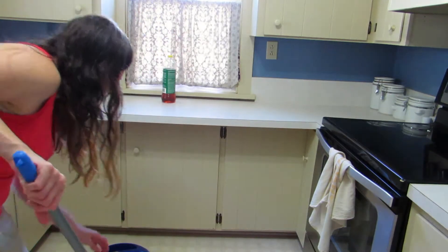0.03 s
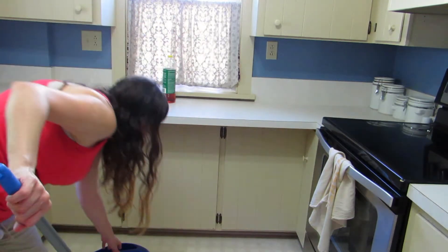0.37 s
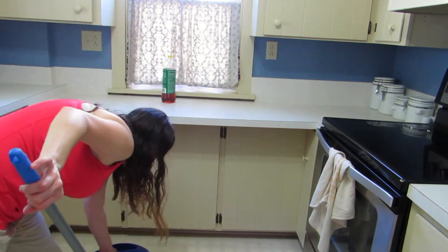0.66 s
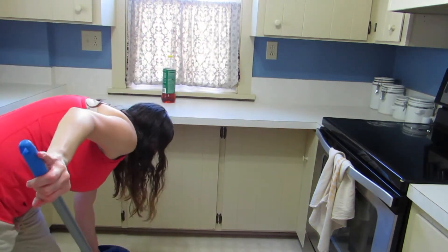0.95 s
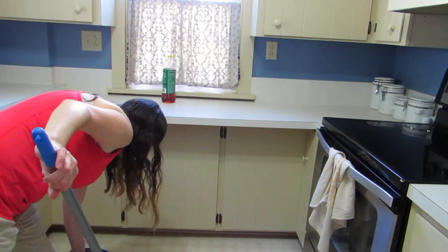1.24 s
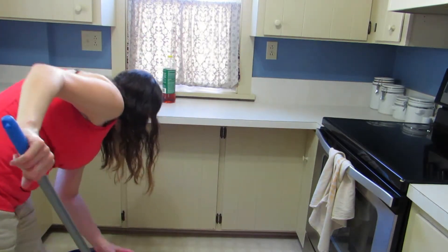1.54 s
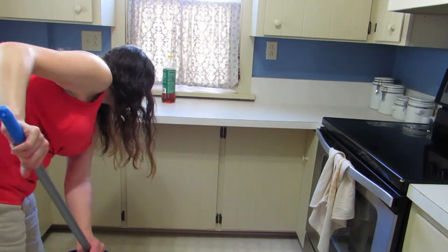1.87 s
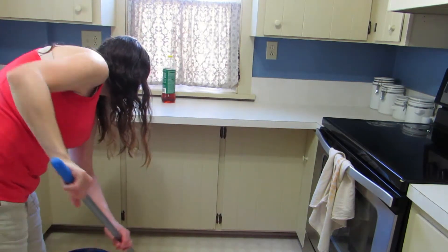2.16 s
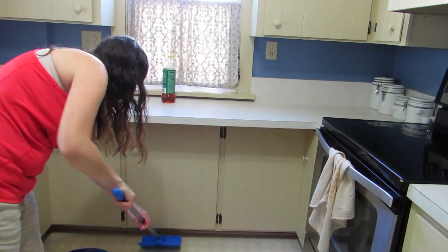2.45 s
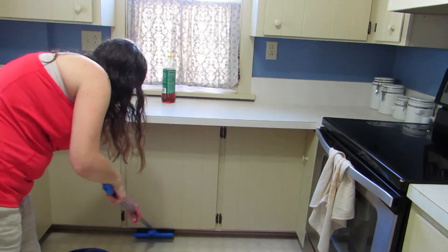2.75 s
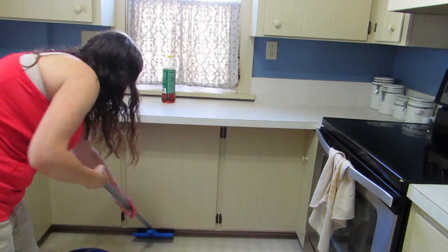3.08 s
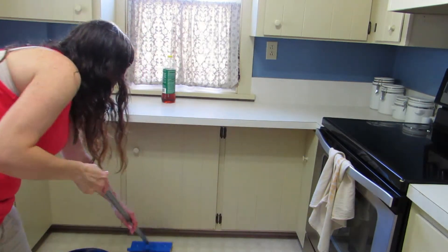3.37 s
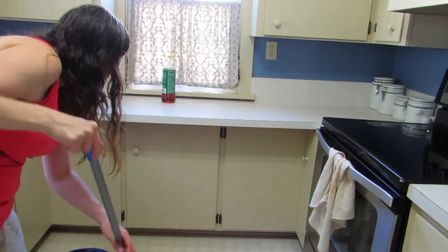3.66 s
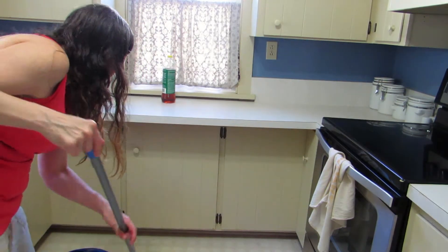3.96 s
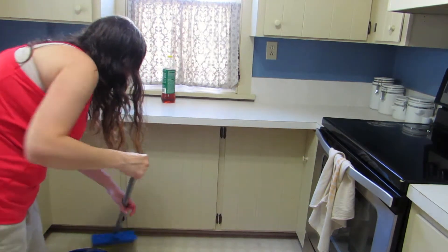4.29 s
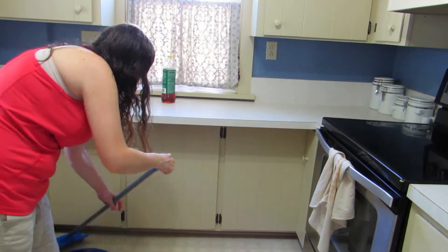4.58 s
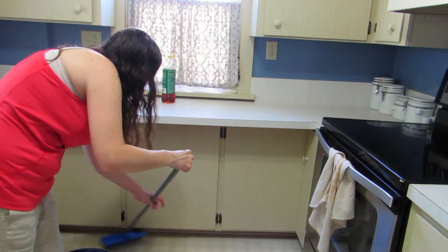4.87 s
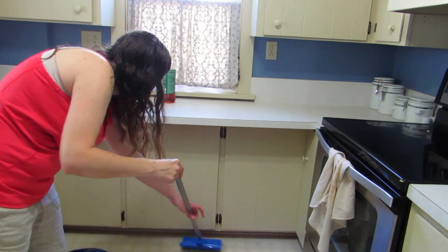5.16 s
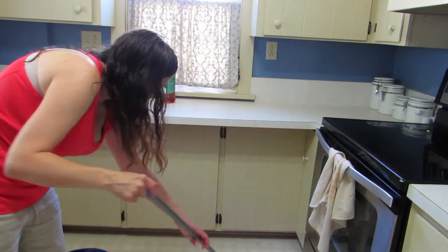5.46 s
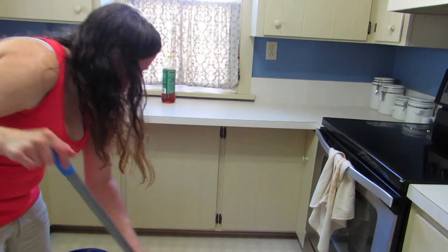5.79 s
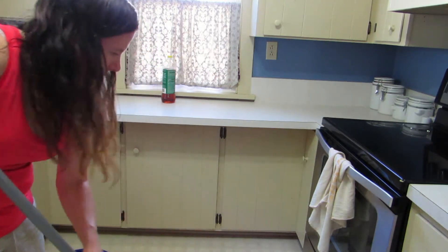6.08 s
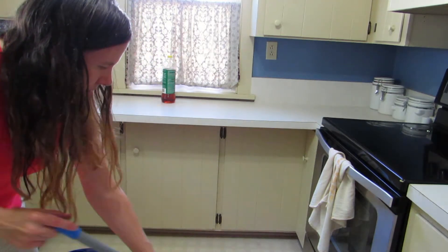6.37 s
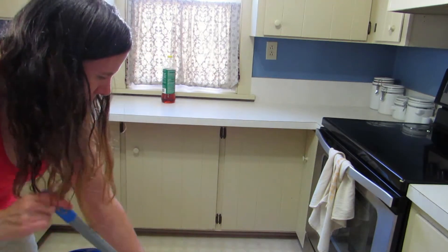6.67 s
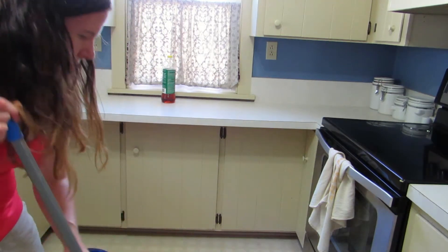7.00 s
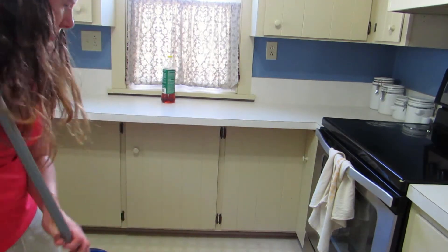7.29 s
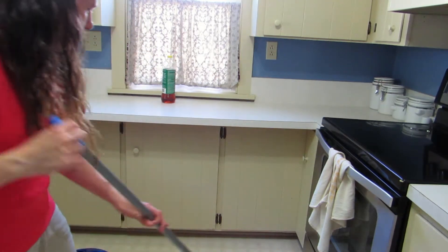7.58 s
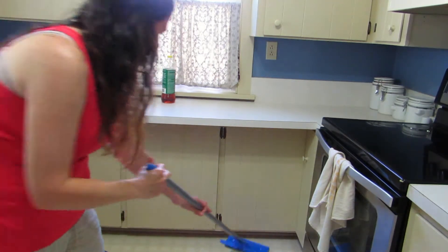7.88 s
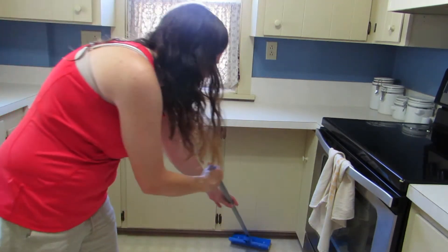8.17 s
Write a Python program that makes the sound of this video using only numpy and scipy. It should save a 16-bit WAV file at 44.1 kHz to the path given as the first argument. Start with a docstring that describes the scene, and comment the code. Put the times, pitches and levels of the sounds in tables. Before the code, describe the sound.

Water patters briefly into a bucket as a mop is wrung out, with light knocks and a faint rustle of clothes. The mop thuds down and is pushed about, its wet pad scrubbing and its head clacking. Later the handle clangs loudly against sheet metal, leaving a long shimmering ring and two small knocks. A low refrigerator hum fills the small, slightly echoing kitchen, heard through a narrow-band microphone that overloads a little.

```python
"""A refrigerator hums in a small hard kitchen. Cloth rustles, a flat mop knocks lightly and is wrung out,
and water patters into a bucket. The mop is set down on the floor with a thud and pushed about:
its wet pad scrubs, its head and swivel knock. Back at the bucket the metal handle hits sheet metal,
which clangs and rings on under two last knocks. The loudest blows overload a narrow-band microphone."""
import sys
import numpy as np
from scipy import signal
from scipy.fft import rfft, irfft
from scipy.io import wavfile
from scipy.ndimage import uniform_filter1d, minimum_filter1d

SR = 44100
rng = np.random.default_rng(int(sys.argv[2]) if len(sys.argv) > 2 else 0)


def master(y):
    """Save y as 16-bit WAV."""
    cut = np.clip(np.atleast_2d(y).T, -1, 1)
    pcm = np.round(cut * 32767)  # scale
    wavfile.write(sys.argv[1], SR, pcm.astype(np.int16))


N = 363162


def amp(db):
    """Decibels to gain."""
    return 10 ** (np.asarray(db) / 20)


def unit(x):
    """Scales to rms 1."""
    return x / np.sqrt(np.mean(x ** 2) + 1e-20)


def read(curve, hz):
    """Reads a curve on a log-frequency axis."""
    f, value = np.transpose(curve)
    return np.interp(np.log(hz + 1), np.log(f + 1), value)


def add(mix, start_s, sound):
    """Mixes a sound in at its start time."""
    part = mix[max(round(start_s * SR), 0):][:len(sound)]
    part += sound[:len(part)]


def colour(x, spectrum):
    """Shapes x with an EQ curve, at rms 1."""
    hz = np.fft.rfftfreq(len(x), 1 / SR)
    return unit(irfft(rfft(x) * amp(read(spectrum, hz)), len(x)))


def noise(gains):
    """Noise with the given gain at each frequency, at rms 1."""
    return unit(irfft(rfft(rng.standard_normal(N)) * gains, N))


def die_away(x, t60_curve):
    """Lets each band of x decay at its own speed; t60 is the time to fall 60 dB."""
    hz, t, bands = signal.stft(x, SR, nperseg=512)
    decay = amp(-60 * t / read(t60_curve, hz)[:, None])
    return signal.istft(bands * decay, SR, nperseg=512)[1][:len(x)]


def ring(modes, size):
    """Damped sines of random polarity."""
    t = np.arange(size) / SR
    return sum(rng.choice([-1, 1]) * amp(db - 60 * t / t60) * np.sin(2 * np.pi * hz * t)
               for hz, db, t60 in modes)


def strokes(rows, attack_s, release_s):
    """Envelope of hand movements: each builds up, holds and dies away."""
    t = np.arange(N) / SR
    return sum(amp(db) * np.clip((t - start) / attack_s, 0, 1)
               * np.exp(-np.maximum(t - start - hold, 0) / release_s) for start, hold, db in rows)


# The room's tail. Each row: frequency in Hz, t60 in seconds.
ROOM_T60 = [(120, 0.38), (300, 0.45), (600, 0.56), (1200, 0.52), (3000, 0.55), (7000, 0.53)]

def kitchen(direct=0.45, early_boost=1.86, early_s=0.037):
    """Direct sound, a cluster of echoes from floor and cupboards, and the tail of the room."""
    t = np.arange(SR) / SR
    taps = rng.choice([-1, 1], SR) * (rng.random(SR) < 1 / 10)
    echoes = die_away(taps, ROOM_T60) * (1 + early_boost * np.exp(-t / early_s))
    return echoes / np.linalg.norm(echoes) + direct * (t == 0)


def grains(per_s, spread_db):
    """Random small impacts of uneven size, heard through the room."""
    sizes = amp(spread_db * np.minimum(rng.exponential(1, N), 4)) * rng.choice([-1, 1], N)
    impacts = sizes * (rng.random(N) < per_s / SR)
    return signal.fftconvolve(impacts, kitchen())[:N]


# Room and cabinet resonances. Each row: centre in Hz, width in Hz, level in dB.
DRONE_BANDS = [(18.4, 16, -29), (57, 20, -37), (87, 12, -48), (146.3, 1.6, -50.5), (229.4, 16, -41.5),
               (263.5, 12, -50), (327.8, 9, -44), (459, 85, -48), (748, 27, -52.5), (1200, 26, -62)]
# Steady room tone. Each row: frequency in Hz, relative level in dB.
AIR_EQ = [(15, 0.5), (26, 4), (38, -16.5), (60, -14.5), (110, -15.5), (260, -18), (700, -27), (1000, -29.5),
          (1600, -40.5), (2100, -39), (3200, -47.5), (4800, -67), (6700, -56.5), (7600, -65)]

def refrigerator(mains_hum_hz=120, hum_db=-32, fade_db=9.5, waver=0.11, air_db=-28):
    """Wavering mains hum over the resonances that the refrigerator stirs and the soft air of the room."""
    t, hz = np.arange(N) / SR, np.fft.rfftfreq(N, 1 / SR)
    drift = noise(np.exp(-hz / 3))
    level = amp(hum_db - fade_db * (t / t[-1]) ** 1.35)  # sinks ever faster
    hum = level * unit(np.sin(2 * np.pi * mains_hum_hz * t)) * (1 + waver * drift)
    drone = sum(amp(db) * noise(1 / (1 + (2 * (hz - centre) / width) ** 2))
                for centre, width, db in DRONE_BANDS)
    air = amp(air_db) * colour(rng.standard_normal(N), AIR_EQ)
    return hum + drone + air


# Rubs of pad and clothes. Each row: start in seconds, length in seconds, level in dB.
SWISH_STROKES = [(0.01, 0.021, -46), (0.12, 0.4, -64), (1.92, 0.32, -55.5), (2.28, 0.35, -62),
                 (2.87, 0.17, -57), (3.22, 0.22, -59), (3.44, 0.3, -56), (4.78, 0.21, -58),
                 (5.40, 0.28, -61), (5.81, 0.095, -57), (6.87, 0.24, -52)]
# Their bright, dry tone. Each row: frequency in Hz, relative level in dB.
SWISH_EQ = [(300, -4), (900, 11), (1600, 14), (3000, 9.5), (4700, -8), (5600, 0), (6800, 4.5), (8000, -5)]

def swishes():
    """Dry fibres catch and slip in a fine grain."""
    friction = colour(grains(per_s=1500, spread_db=-4), SWISH_EQ)
    return strokes(SWISH_STROKES, attack_s=0.034, release_s=0.066) * friction


# What a blow rings, from low thud to top click. Each row: pitch in Hz, relative level in dB,
# t60 in seconds.
FLOOR_MODES = [(163.5, -3, 0.035), (252, 0, 0.063), (308, 1, 0.04), (353, 4, 0.043)]
HEAD_MODES = [(460.3, 6.5, 0.024), (553, -5, 0.076), (653, -4.5, 0.074), (701, -1, 0.036)]
SWIVEL_MODES = [(822, 8, 0.011), (1010, 0.5, 0.02), (1167, 3.5, 0.014), (1467, -3, 0.012)]
HANDLE_MODES = [(1795, 5.5, 0.0062), (2200, -2.5, 0.0095), (2607, -0.5, 0.0094), (3090, 1, 0.0044)]
TICK_MODES = [(3760, 1, 0.0021), (4700, -5, 0.0021), (5660, -5.5, .003), (6540, 3.5, 0.0021)]
# What each new contact loses, in dB: floor, head, swivel, handle, tick.
CONTACT_LOSS_DB = [11, 2.7, 7, 20, 6.6]
# The mop's blows. Each row: start in seconds, number of contacts, floor, head and swivel levels in dB,
# hardness in dB per octave.
MOP_BLOWS = [(0.470, 2, -40, -32.5, -27.5, -5), (0.553, 1, -56, -54, -54, 8),
             (0.584, 1, -56, -41, -40.5, -5), (0.656, 1, -58, -60, -64.5, 13),
             (2.138, 1, -52.5, -67, -58, 10), (2.587, 4, -1.5, -13, -15.5, -0.5),
             (3.121, 2, -18, -30, -36.5, 1), (3.179, 1, -38, -32.5, -30.5, -2.5),
             (3.816, 1, -52, -41.5, -42.5, -0.5), (4.131, 2, -31.5, -25, -34, 5),
             (4.433, 1, -34, -32, -29, -2), (4.609, 1, -62, -45, -38.5, 3), (5.642, 1, -66, -41.5, -52, -3),
             (8.116, 1, -47, -30, -32.5, 3), (8.183, 1, -48, -33.5, -33.5, -1)]

def knocks(rock_s=0.023, to_handle_db=-9.5, to_tick_db=-28):
    """Each blow rings floor, head and swivel; the flat head may rock from edge to edge before it rests."""
    out = np.zeros(N)
    handle_octaves = np.log2(HANDLE_MODES[0][0] / SWIVEL_MODES[0][0])
    tick_octaves = np.log2(TICK_MODES[0][0] / SWIVEL_MODES[0][0])
    for start, contacts, floor_db, head_db, swivel_db, hardness in MOP_BLOWS:
        # the harder the blow, the more the swivel passes on to handle and tick
        handle_db = swivel_db + to_handle_db + hardness * handle_octaves
        tick_db = swivel_db + to_tick_db + hardness * tick_octaves
        parts = [(FLOOR_MODES, floor_db), (HEAD_MODES, head_db), (SWIVEL_MODES, swivel_db),
                 (HANDLE_MODES, handle_db), (TICK_MODES, tick_db)]
        for k in range(contacts):
            room = kitchen()
            for (modes, db), loss_db in zip(parts, CONTACT_LOSS_DB):
                add(out, start + k * rock_s, amp(db - k * loss_db) * strike(modes, room))
    return out


def strike(modes, room, cushion_s=0.0038, flex_s=0.004):
    """One part, struck once and heard through the room."""
    low_hz, high_hz = modes[0][0], modes[-1][0]
    blow = signal.fftconvolve(ring(modes, size=12000), room)
    # a part radiates little outside the range of its modes
    band = signal.butter(2, [0.8 * low_hz, 1.103 * high_hz], "band", fs=SR, output="sos")
    blow = signal.sosfilt(band, blow)
    # the soft pad cushions the contact, and the higher parts take longer to get going
    rise_s = cushion_s + flex_s * min(low_hz / HANDLE_MODES[0][0], 1)
    blow *= 1 - np.exp(-np.arange(len(blow)) / (SR * rise_s))
    return blow / np.std(blow[:SR // 25])  # rms 1 over the first 40 ms


# Squeezes of the mop. Each row: start in seconds, length in seconds, water level in dB.
WRINGS = [(0.70, 0.2, -34.5), (0.91, 0.072, -31.5), (1.05, 0.21, -40.5)]
# The tone of water in the bucket. Each row: frequency in Hz, relative level in dB.
PATTER_EQ = [(110, 3), (165, 17), (250, -6.5), (500, 2.5), (1000, -5), (1500, -11.5), (2000, -12.5),
             (3100, -22), (4700, -39.5), (7000, -38)]
# Big drops. Each row: start in seconds, pitch in Hz, level in dB.
DROPS = [(0.957, 1010, -27), (1.151, 1700, -52)]

def water(plop_t60=0.13, glide=0.17):
    """Wrung-out water gushes and drains into the bucket; big drops leave a bubble that rises in pitch."""
    patter = colour(grains(per_s=1300, spread_db=1.8), PATTER_EQ)
    out = strokes(WRINGS, attack_s=0.053, release_s=0.13) * patter
    t = np.arange(SR // 5) / SR
    for start, hz, db in DROPS:
        bubble = np.sin(2 * np.pi * hz * t * (1 + glide * t))
        envelope = amp(db - 60 * t / plop_t60) * (1 - np.exp(-t / 0.0018))
        add(out, start, envelope * bubble)
    return out


# Pushes of the mop. Each row: start in seconds, length in seconds, level in dB.
SCRUB_STROKES = [(3.53, 0.14, -36), (4.66, 0.5, -50), (5.62, 0.26, -46.5)]
# Their dark, wet tone. Each row: frequency in Hz, relative level in dB.
SCRUB_EQ = [(250, -16), (500, 3), (1000, -1), (1500, -11), (2200, -21), (3500, -26), (5000, -29.5),
            (7500, -28.5)]

def scrubs():
    """The wet pad drags over the floor in a coarse grain."""
    friction = colour(grains(per_s=460, spread_db=8), SCRUB_EQ)
    return strokes(SCRUB_STROKES, attack_s=0.1, release_s=0.044) * friction


# The handle's hits on the sheet metal. Each row: start in seconds, level in dB.
METAL_HITS = [(6.421, -10), (6.433, -10), (6.452, -15), (6.470, -13.5)]
# The tone of each crash. Each row: frequency in Hz, relative level in dB.
CRASH_EQ = [(25, -13), (55, -11.5), (78, -1.5), (115, -11), (160, -11.5), (205, -22), (270, -12.5),
            (450, -15), (720, -12.5), (1150, -16), (1350, -23), (1900, -22), (3200, -34), (4800, -52.5),
            (6000, -43.5), (7200, -46.5)]
# Its decay. Each row: frequency in Hz, t60 in seconds.
CRASH_DECAY = [(60, 0.41), (160, 0.45), (300, 0.91), (1000, 0.73), (3000, 0.7), (7000, 0.41)]

def clang(give_s=0.0038):
    """The handle chatters against the thin sheet, which gives way and then crashes at each contact."""
    out, t = np.zeros(N), np.arange(2 * SR) / SR
    for start, db in METAL_HITS:
        crash = die_away(colour(rng.standard_normal(len(t)), CRASH_EQ), CRASH_DECAY)
        add(out, start, amp(db) * crash * (1 - np.exp(-t / give_s)))
    return out


# The sheet's long ring and the hollow handle's thin, high one. Each row: pitch in Hz, level in dB,
# t60 in seconds.
SHEET_MODES = [(164, -17, 1.3), (276, -22.5, 4.8), (377, -30, 2.5), (564, -28, 5), (587, -23, 2.3),
               (608, -18, 1), (623, -27, 4.9), (669, -32, 5), (707, -19, 1.1), (721, -16, 1.2),
               (795, -20, 4.1), (810, -27, 4.4), (858, -23, 3), (949, -27, 2.7), (1009, -28, 2.9),
               (1151, -28, 3.1), (1169, -17, 1.7), (1383, -28, 1.3), (1509, -23, 1.2), (1587, -32, 4),
               (1628, -27, 2.8), (1703, -32, 2.3), (1772, -34, 2.6), (1836, -22, 1), (1899, -28, 1.9),
               (1996, -33, 3.2), (2063, -25, 2.6), (2355, -34, 2.1), (2783, -34.5, 1.7), (2887, -35.5, 2.2)]
TUBE_MODES = [(2248, -35, 1.7), (2309, -37, 1.5), (2370, -35, 1.5), (2482, -42, 1.8), (2845, -39, 1.4),
              (2988, -42, 1.4), (3058, -44, 1.5), (3133, -38, 1), (3297, -37, 1.1), (3903, -47, 1.1),
              (4212, -51, 1.4), (4334, -49, 1), (4479, -52, 1.7), (4587, -48, .8), (5591, -50, 1.5),
              (6780, -54, 1)]
# The sheet's shimmer of weaker modes. Each row: frequency in Hz, typical level of one mode in dB.
SHIMMER_LEVELS = [(450, -41), (650, -33.5), (1300, -43.5), (1900, -37.5), (2500, -52), (3200, -51.5),
                  (4000, -59), (4900, -69), (5700, -61), (7400, -56)]
# Its decay. Each row: frequency in Hz, t60 in seconds.
SHIMMER_DECAY = [(450, 6), (1800, 2.42), (3200, 1.57), (5500, 1.3), (7400, 0.79)]

def metal_ring(bloom_s=0.015, shimmer_modes=230):
    """From the first hit on, sheet and handle ring, and their close modes beat."""
    out, t = np.zeros(N), np.arange(2 * SR) / SR
    # the modes of a plate lie about evenly along the frequency axis, each struck more or less hard
    grid, step = np.linspace(SHIMMER_LEVELS[0][0], SHIMMER_LEVELS[-1][0], shimmer_modes, retstep=True)
    hz = grid + step * rng.uniform(-0.5, 0.5, shimmer_modes)
    db = read(SHIMMER_LEVELS, hz) + rng.uniform(-8, 6, shimmer_modes)
    shimmer = list(zip(hz, db, read(SHIMMER_DECAY, hz)))
    tones = sum(ring(modes, size=len(t)) for modes in (SHEET_MODES, TUBE_MODES, shimmer))
    add(out, METAL_HITS[0][0], tones * (1 - np.exp(-t / bloom_s)))
    return out


def scene():
    """The mono mix: blows and ringing metal over hum, water and rubbing."""
    return (knocks() + clang() + metal_ring() + refrigerator() + water() + swishes() + scrubs())[None]


def record(dry, limit_db=-2, excess_removed=0.6, mic_edge_hz=7650, output_edge_hz=16000):
    """A peak limiter holds down loud blows; the microphone's band is narrow, and what slips by clips."""
    peak = -minimum_filter1d(-abs(dry[0]), size=300)
    over_db = np.maximum(20 * np.log10(peak + 1e-9) - limit_db, 0)
    held = dry * amp(-excess_removed * uniform_filter1d(over_db, size=300))
    mic_lowpass = signal.firwin(161, mic_edge_hz, window=("kaiser", 8), fs=SR)
    clipped = np.clip(signal.oaconvolve(held, mic_lowpass[None], "same"), -1, 1)
    output_lowpass = signal.firwin(255, output_edge_hz, window=("kaiser", 9), fs=SR)
    return signal.oaconvolve(clipped, output_lowpass[None], "same")


dry = scene()
out = record(dry)
master(out)
```